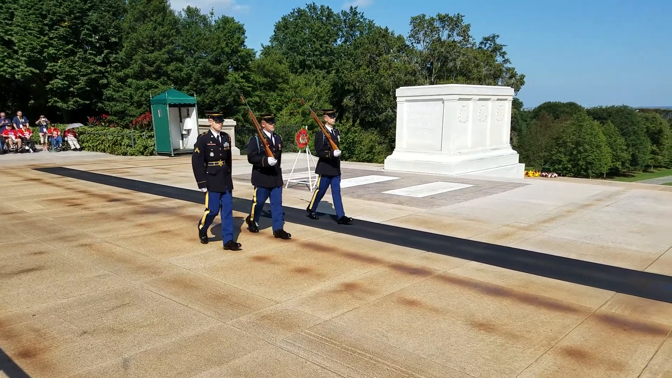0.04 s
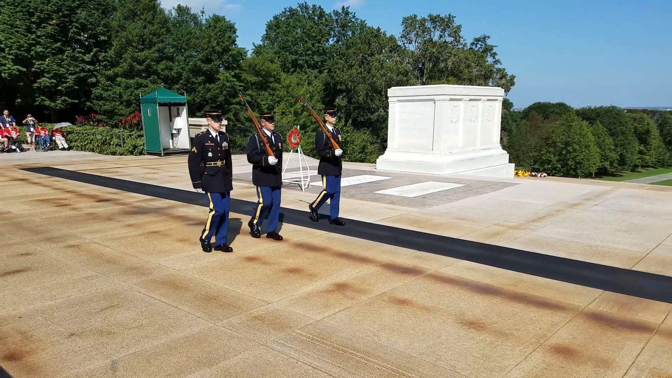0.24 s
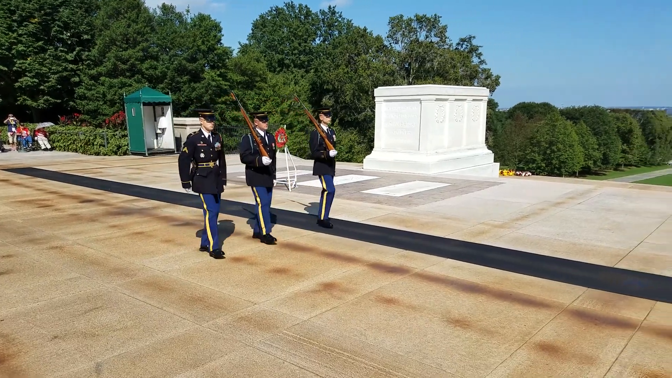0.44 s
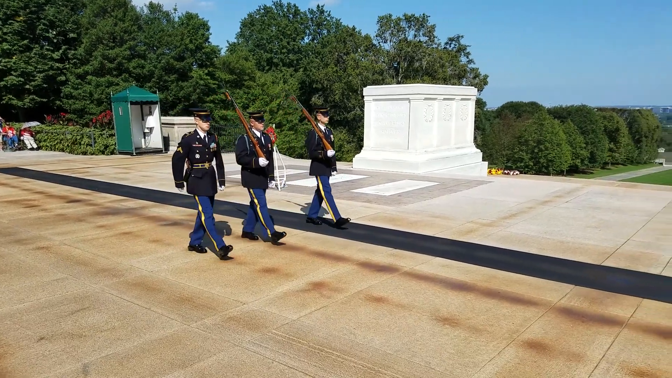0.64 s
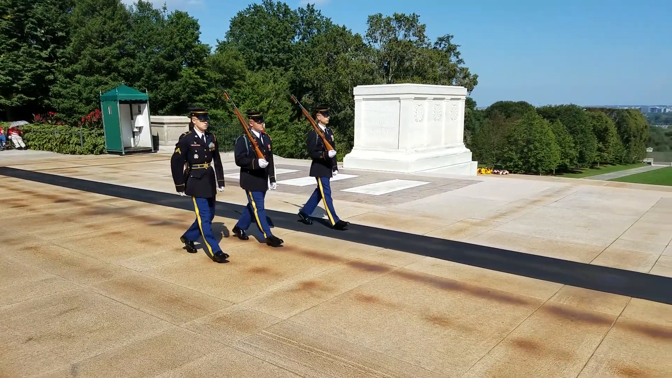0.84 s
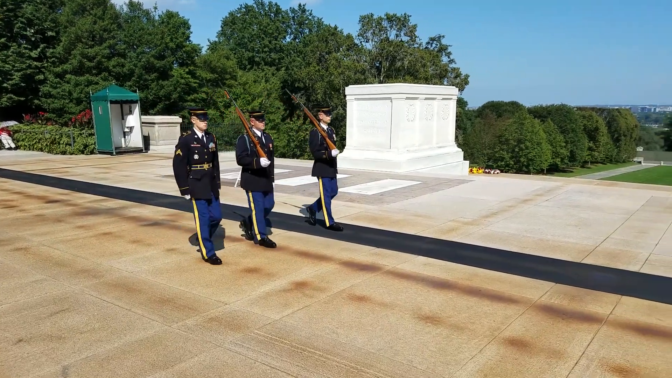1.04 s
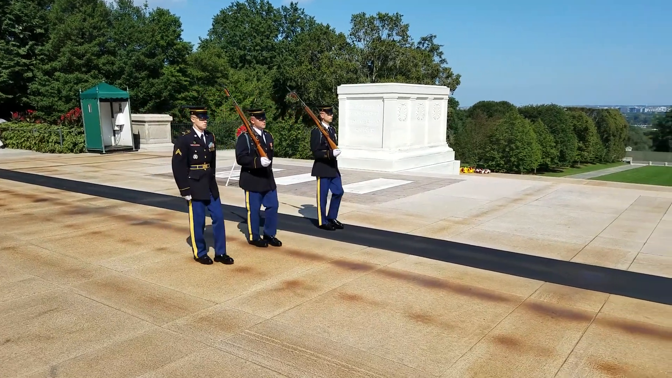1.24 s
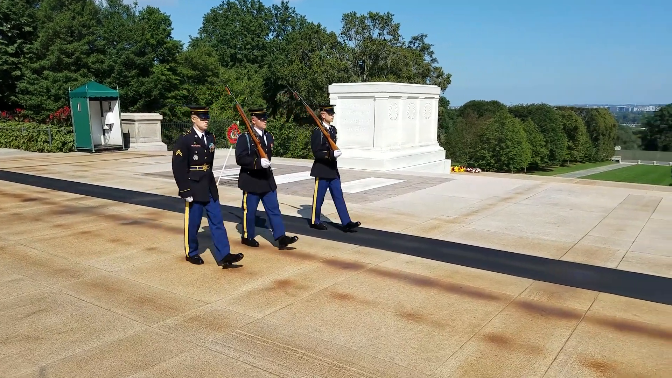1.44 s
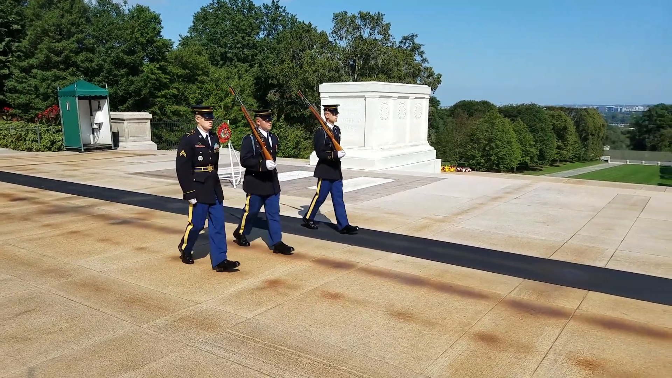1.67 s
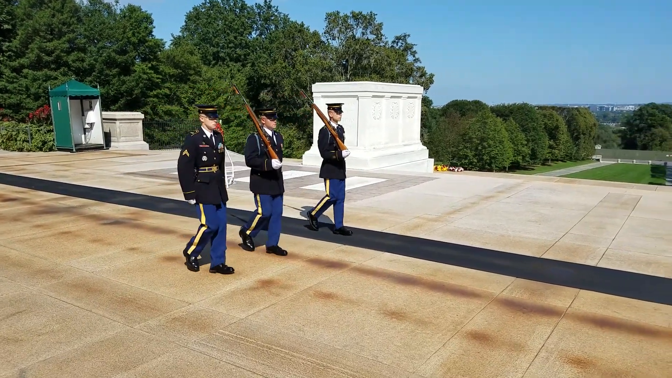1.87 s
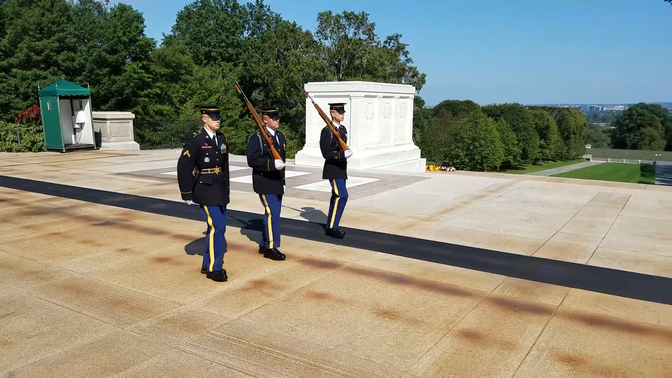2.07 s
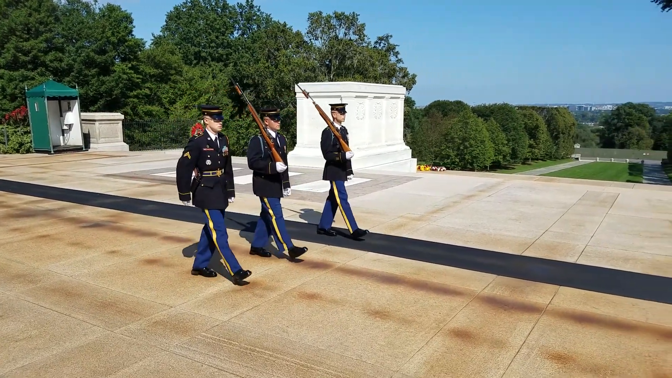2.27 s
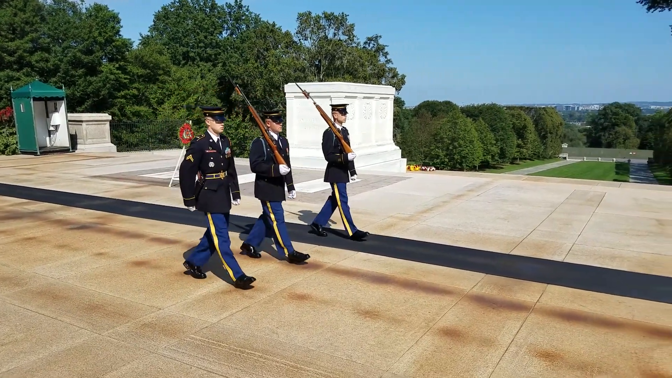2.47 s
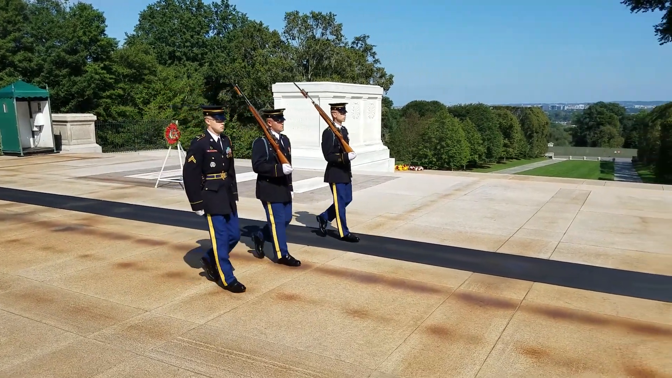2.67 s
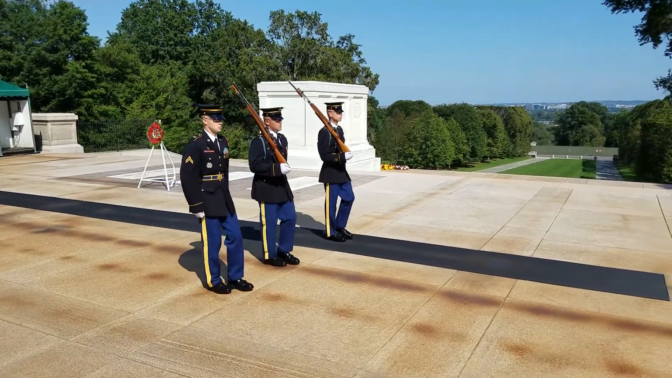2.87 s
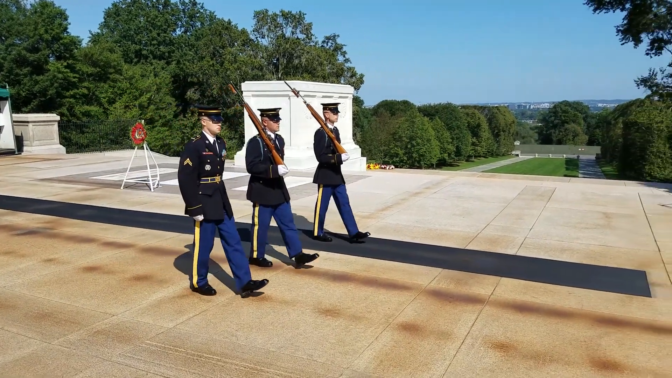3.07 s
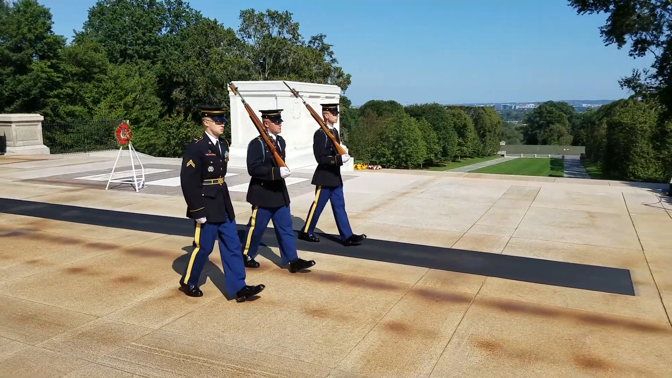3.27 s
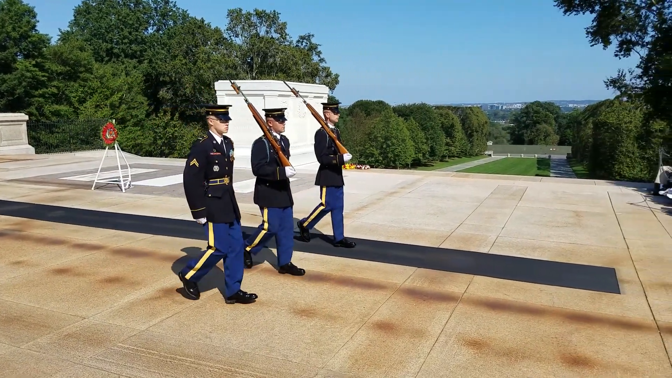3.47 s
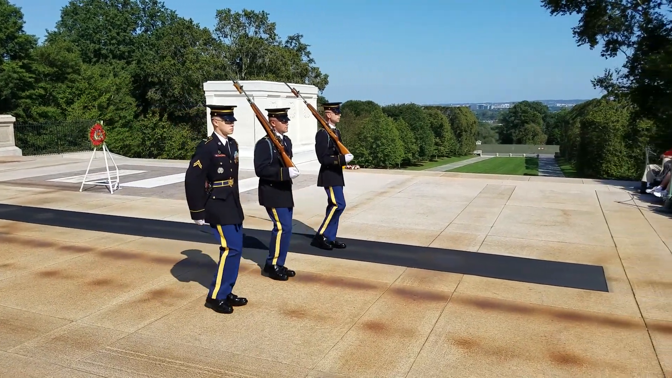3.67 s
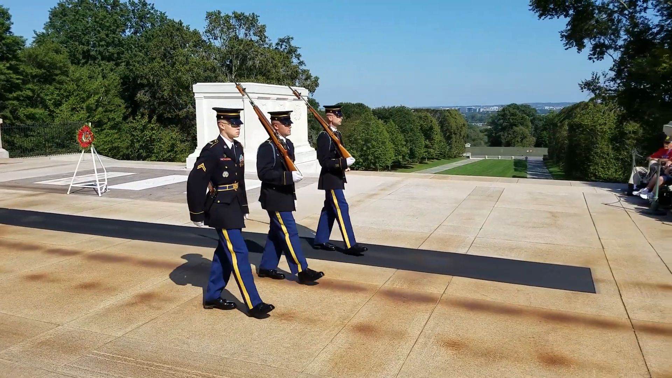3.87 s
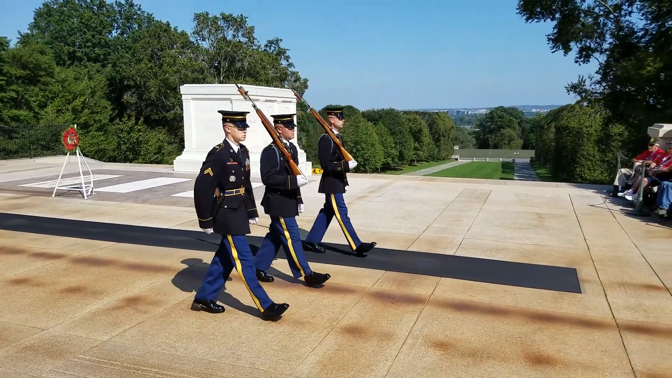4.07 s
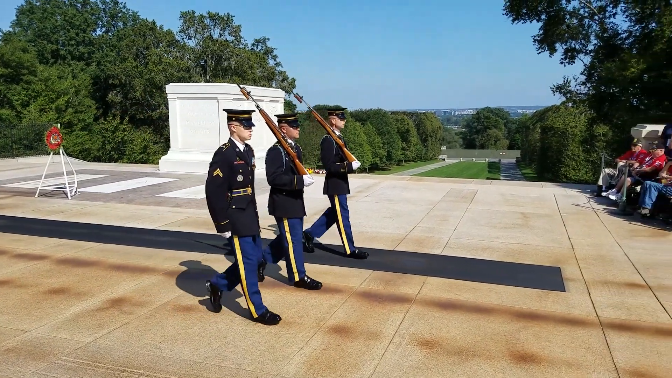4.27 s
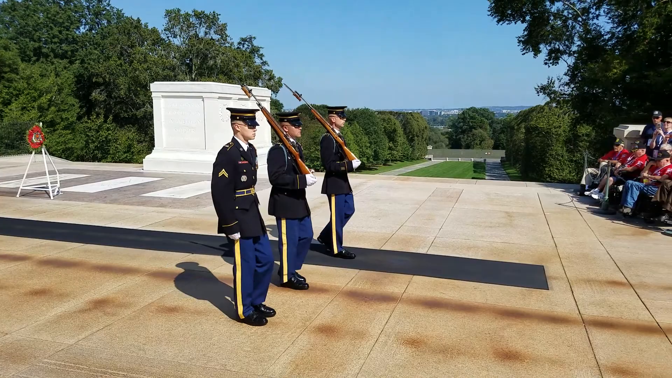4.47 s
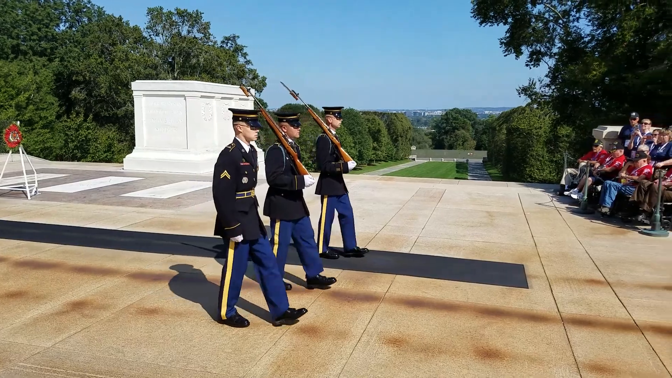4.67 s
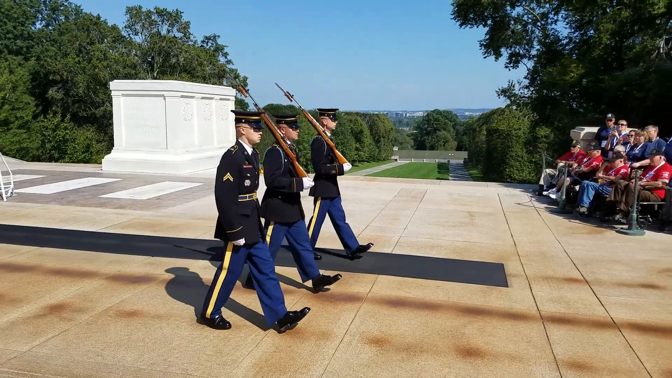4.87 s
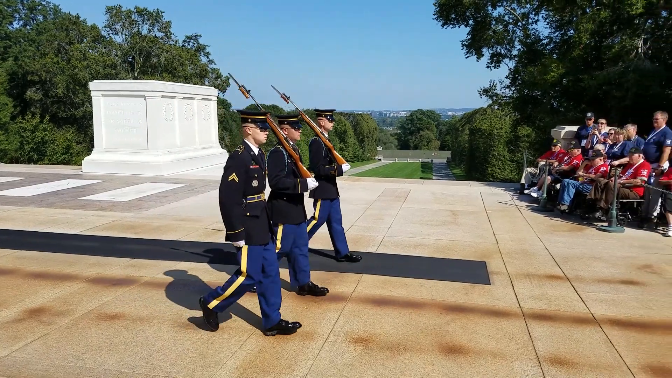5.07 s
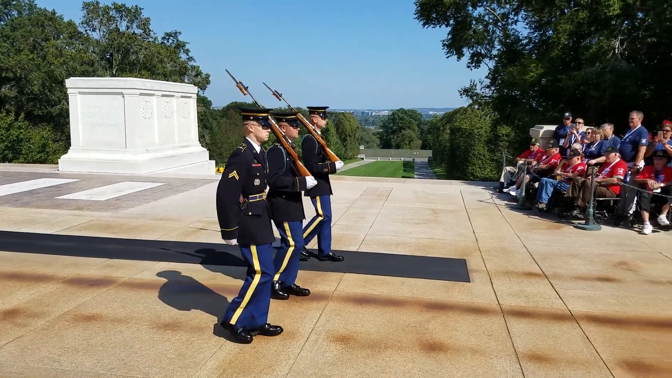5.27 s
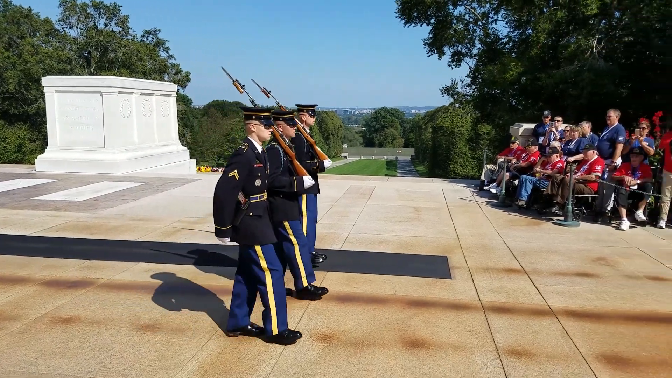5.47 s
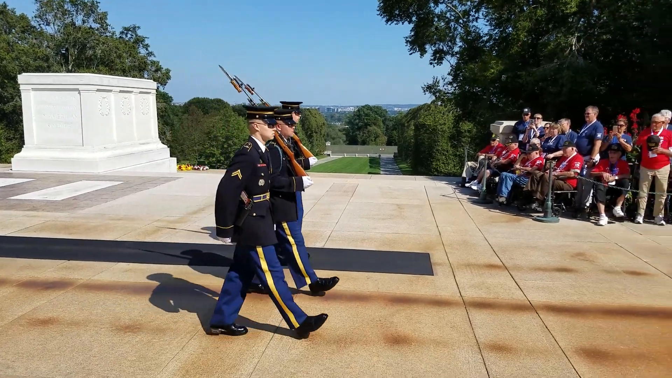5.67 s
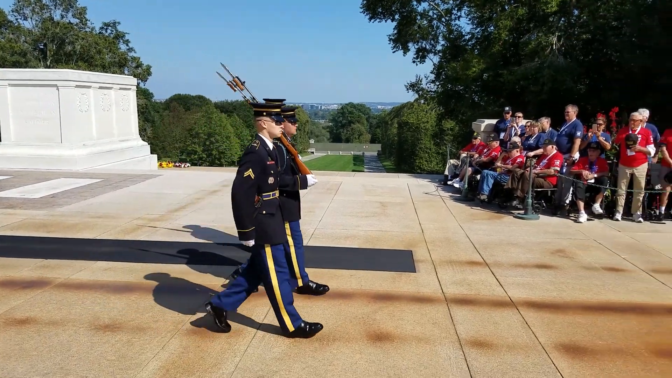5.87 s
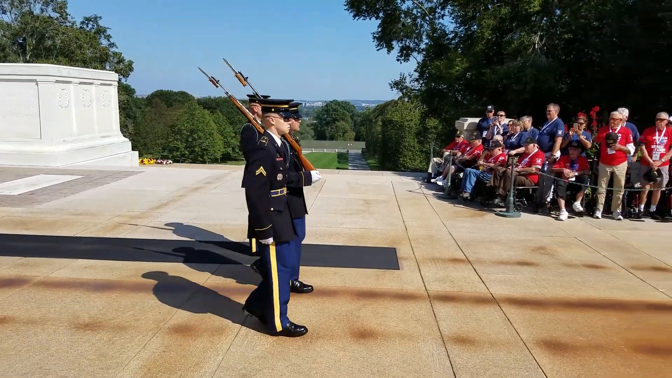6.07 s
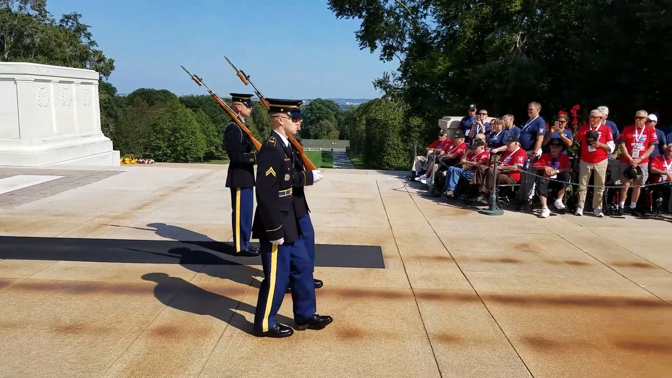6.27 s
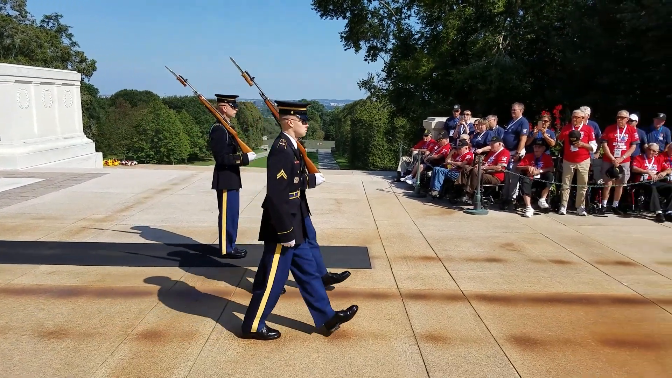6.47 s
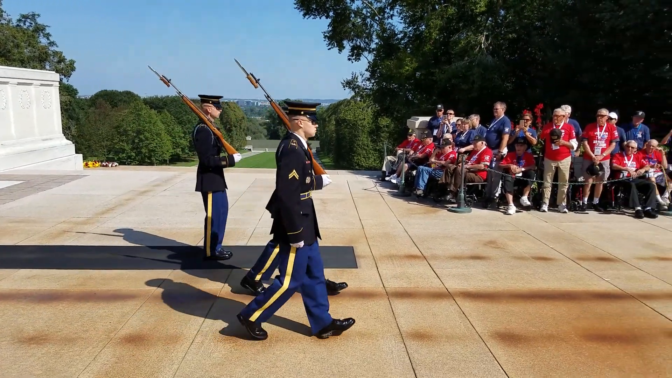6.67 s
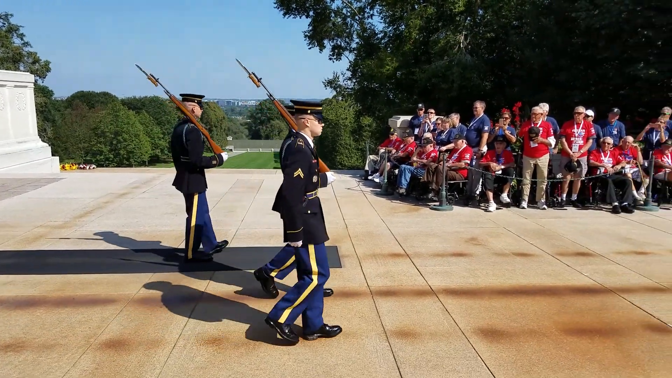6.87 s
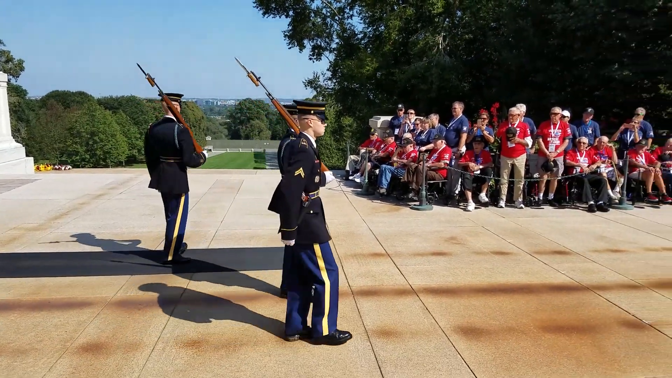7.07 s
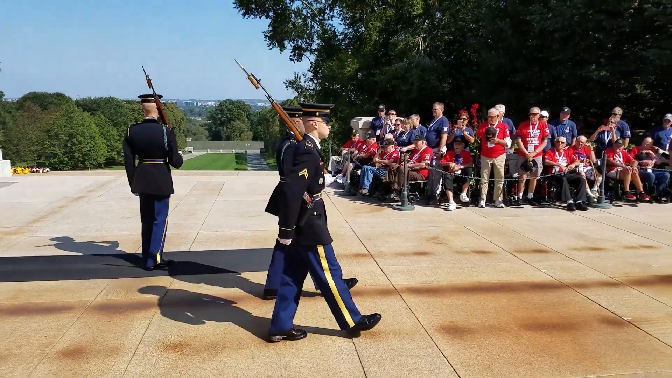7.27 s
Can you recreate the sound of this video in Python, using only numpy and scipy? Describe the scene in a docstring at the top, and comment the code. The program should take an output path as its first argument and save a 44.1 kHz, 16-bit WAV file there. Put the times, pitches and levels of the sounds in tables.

```python
"""An engine-like rumble with a hum, open air and an insect's chirps (shaped noise, wavering sines) sound throughout.
Light taps (noise bursts), two faint bird whistles (gliding sines) and the first step come before the rumble swells.
Guards march in slow step over stone, two steel-shod heels milliseconds apart (damped modes, noise bursts), with scuffs.
A low tone rises briefly in pitch. Later two shoes clack together and the stone terraces ring (decaying noise).
One more step and a few taps follow, and the rumble eases at the end."""
import sys
import numpy as np
from scipy import signal
from scipy.fft import rfft, irfft, next_fast_len
from scipy.io import wavfile
from scipy.ndimage import uniform_filter1d, map_coordinates

SR = 44100
rng = np.random.default_rng(int(sys.argv[2]) if len(sys.argv) > 2 else 0)


def pcm_store(signal):
    """Save signal as 16-bit PCM."""
    levels = np.round(np.clip(np.atleast_2d(signal), -1, 1) * 32767)
    wavfile.write(sys.argv[1], SR, levels.astype(np.int16).T)


N = 323694

# pan_db: left over right

# relative spectra of rumble, air and hiss: frequency_hz, density_db
RUMBLE_SPECTRUM = [(12, -69), (20, -27), (52, -1.5), (124, 0), (161, -3.5), (270, -6), (336, -17.5),
                   (396, -18.5), (436, -26.5), (520, -25.5), (680, -69), (1140, -120)]
AIR_SPECTRUM = [(200, -5), (330, 1.5), (400, -1.5), (490, -7.5), (620, -2.5), (840, 0), (1100, -11),
                (1600, -14.5), (2400, -26.5), (4000, -54)]
HISS_SPECTRUM = [(900, -19), (2000, 6), (3000, 2.5), (3500, -1), (5000, -1.5), (6900, -7), (7800, 0.5),
                 (8450, -1.5), (8900, -13.5), (11000, -8), (13000, -6.5), (15500, -5.5), (16300, -25)]
# left-right correlation of the background: frequency_hz, correlation
STEREO_LIKENESS = [(60, 0.88), (150, 1), (380, 0.88), (950, 0.25), (2380, -0.1), (5980, 0.0084),
                   (15000, -0.18)]
# engine hum, before its wander: centre_hz, level_re_rumble_db
HUM_TONES = [(60.5, -9), (124, -11.5)]
# clearer taps of soles and gear: start_s, clack_db, click_db, pan_db
TAPS = [(0.0454, -46.5, -56.5, -6), (0.876, -66, -47.5, -4), (0.9524, -54, -56.5, -5),
        (1.7048, -41.5, -53, -2.5), (2.9068, -56, -47, 9.5), (3.3735, -43, -57, -2),
        (3.3925, -46, -50.5, -3), (4.2502, -51, -51, -1), (4.2867, -56, -52, 7), (5.042, -48, -58, -5),
        (5.062, -45.5, -52, -1), (5.934, -44, -54, -2), (6.871, -45.5, -49.5, 1)]
# colour of a sole coming down flat: frequency_hz, gain_db
SOLE_COLOUR = [(450, -15), (850, 1.5), (1400, 4), (2000, 2.5), (2600, -8), (3400, -21), (8000, -30)]
# colour of a steel plate on stone: frequency_hz, gain_db
STEEL_COLOUR = [(1500, -32.5), (2900, 0), (4200, 2), (5800, -0.5), (7000, -6.5), (8500, -10), (11000, -6),
                (13000, -10), (15500, -7.5), (17000, -25)]
# colour of the plaza's returns: frequency_hz, gain_db
PLAZA_COLOUR = [(150, -13), (700, 1), (1500, 0.5), (2500, -4), (4000, -5), (8000, -3), (15000, -1)]
# decay of the plaza's returns: frequency_hz, t60_s
PLAZA_DECAY = [(200, 0.65), (1500, 0.9), (5000, 0.97), (15000, 0.45)]
# far bird's falling whistles, before their wander: start_s, length_s, start_hz, end_hz, level_db
WHISTLES = [(0.132, .46, 3370, 3060, -72.5), (0.893, 0.25, 3130, 3020, -74)]
# marching steps, base levels: start_s, second_heel_lag_s, thump_db, knock_db, click_db, second_over_first_db, scuff_db
STEPS = [(0.7603, 0.0062, -44.5, -41.5, -34, 0, -70), (1.605, 0.0079, -38, -35.5, -34.5, -5, -55.5),
         (2.43, .0054, -33, -42, -35, 2, -59.5), (3.2633, 0.0087, -30, -35, -36, -1, -63),
         (4.0825, .0034, -36, -39, -38.5, -2.5, -56.5), (4.9216, .0051, -31.5, -37, -37, 1, -64.5),
         (5.7416, .0193, -32.5, -42.5, -38.5, 1.5, -70), (6.6009, .0213, -29, -35.5, -38, 0.5, -58)]
# the two heels of a step, leader first: body_offset_db, pan_db
HEELS = [(-1, -4), (1, 1)]
# colour of a leather contact: frequency_hz, gain_db
LEATHER_COLOUR = [(500, -34), (1000, -0.5), (1400, -1.5), (1650, -8.5), (2100, 0), (2700, -1), (3400, -13),
                  (8000, -35)]
# colour of ground grit: frequency_hz, gain_db
SCUFF_COLOUR = [(800, -11), (1700, -2.5), (2400, 3.5), (3200, -7), (5000, -9), (7000, -10.5),
                (10500, -18.5), (12500, -7.5), (14000, -14)]
# shoes clacked together, sole edge then heel: start_s, body_db, click_db, pan_db
HEEL_CLACK = [(5.8095, -30, -27, -5), (5.8115, -17, -34, 10)]
# modes of the hollow heels: centre_hz, level_db, t60_s
HEEL_MODES = [(284, 7.5, 0.039), (602, -4.5, 0.065), (715, 2, 0.051), (864, -7, 0.029), (1360, -8.5, 0.016),
              (2020, -12.5, 0.015), (2280, -21, .022), (2750, -18, 0.027)]
# colour of the terraces' bright wash: frequency_hz, density_db
TERRACE_COLOUR = [(600, -19), (1000, -2), (1400, -4), (1750, -9), (2700, 0), (3200, -8.5), (4100, -4.5),
                  (4850, -8), (5400, -7.5), (6400, -2), (7100, -8), (9700, -8), (12300, -11), (16000, -18)]
# steel plates singing on in the wash: centre_hz, width_hz, level_db
PLATE_RESONANCES = [(2680, 110, -0.5), (4800, 160, 0), (6100, 130, 4), (6460, 140, 3), (7900, 140, 3),
                    (11000, 250, -5)]

RUMBLE_QUIET_DB, RUMBLE_STEADY_DB = -55, -42
SWELL_AT_S, SWELL_S = 1.21, 0.59
EASE_AT_S, EASE_DB_PER_S = 7.1, 24
CHIRP_CENTRE_S, CHIRP_PERIOD_S, CHIRP_LENGTH_S = .49, .51, .12
# gear ticks while the weight shifts after each step
TICK_FROM_S, TICK_SPAN_S = .04, .22
TICK_CLACK_MEAN_DB, TICK_CLICK_MEAN_DB = -56.5, -59
TICK_SCATTER_DB, TICK_PAN_SCATTER_DB = 2, 4
# shoe modes on the ground, before each blow's detuning
THUMP_CENTRE_HZ, THUMP_T60_S = 263, 0.039
KNOCK_CENTRE_HZ, KNOCK_T60_S = 805, 0.025
CLACK_RE_KNOCK_DB = -4.5
ROLL_S, SCUFF_S = .09, .21  # heel strike to scuff; scuff length
DRONE_AT_S, DRONE_ATTACK_S, DRONE_HOLD_S, DRONE_RELEASE_S = 2.95, .15, .38, .14
DRONE_START_HZ, DRONE_RISE_HZ_PER_S, DRONE_MEAN_DB = 205, 28, -44.5
WASH_HOLD_S, WASH_T60_S, WASH_BUILD_S = .085, .63, .012
TOP_HZ = 16350
BLOW_SAMPLES = round(.005 * SR)


def amp(db):
    """Decibels to gain."""
    return 10 ** (np.asarray(db) / 20)


def unit(x):
    """Scale to rms 1."""
    return x / np.sqrt(np.mean(x ** 2) + 1e-20)


def unit_blow(x):
    """Scale to rms 1 over the first 5 ms of a blow."""
    return x / np.sqrt(np.mean(x[..., :BLOW_SAMPLES] ** 2) + 1e-20)


def along(points, hz):
    """Interpolate (frequency, value) points on a log-frequency axis."""
    f, v = np.transpose(points)
    return np.interp(np.log(hz + 1), np.log(f + 1), v)


def wobble(knots_per_s):
    """Smooth random curve through evenly spaced knots."""
    knots = rng.standard_normal(int(N * knots_per_s / SR) + 4)
    return map_coordinates(knots, [np.arange(N) * knots_per_s / SR])


def ramp(start_s, length_s):
    """0 until the start, then straight up to 1."""
    return np.clip((np.arange(N) / SR - start_s) / length_s, 0, 1)


def sine(hz):
    """Sine that follows a frequency curve."""
    return np.sin(2 * np.pi * np.cumsum(hz) / SR)


def filtered(x, response):
    """Apply a frequency response."""
    n = x.shape[-1]
    m = next_fast_len(n + SR // 4)
    return irfft(rfft(x, m) * response(np.fft.rfftfreq(m, 1 / SR)), m)[..., :n]


def coloured(x, points, size=2048):
    """Minimum-phase filter of the given shape: nothing sounds before the blow."""
    cepstrum = irfft(np.log(amp(along(points, np.fft.rfftfreq(size, 1 / SR)))))
    cepstrum[1:size // 2] *= 2
    cepstrum[size // 2 + 1:] = 0
    impulse = irfft(np.exp(rfft(cepstrum)))
    return signal.fftconvolve(x, impulse[None], axes=1)[:, :x.shape[1]]


def add(track, start_s, sound):
    """Mix a stereo sound into the track."""
    part = track[:, round(start_s * SR):][:, :sound.shape[1]]
    part += sound[:, :part.shape[1]]


def sides(pan_db):
    """Left and right gains."""
    return amp([[pan_db / 2], [-pan_db / 2]])


def grit(size, lumpy_db):
    """Uneven strength, millisecond by millisecond, of many tiny contacts or returns."""
    lumps = uniform_filter1d(rng.standard_normal(size), size=48)
    return unit(amp(lumpy_db * unit(lumps)))


def crack(colour, t60_s, grit_db, grit_t60_s, width):
    """Hard contact: a very short noise burst, then grit crushed underneath."""
    t = np.arange(SR // 8) / SR
    burst = amp(-60 * t / t60_s)
    crush = amp(grit_db - 60 * t / grit_t60_s) * grit(size=len(t), lumpy_db=2.0)
    noise = rng.standard_normal(len(t)) + width * rng.standard_normal((2, len(t)))
    return unit_blow(coloured(noise * (burst + crush), colour))


def mode(centre_hz, t60_s, scatter):
    """Damped resonance, tuned a little differently by each blow."""
    t = np.arange(SR // 8) / SR
    hz = centre_hz * np.exp(scatter * rng.standard_normal())
    return unit_blow(np.sin(2 * np.pi * hz * t) * amp(-60 * t / t60_s))


def plaza(sound, build_s):
    """Scattered returns from steps, walls and trees, drawn anew for each contact."""
    hz, t, z = signal.stft(rng.standard_normal((2, SR)), SR, nperseg=256)
    decay = amp(-60 * t / along(PLAZA_DECAY, hz)[:, None])
    tail = signal.istft(z * decay * (1 - np.exp(-t / build_s)), SR, nperseg=256)[1]
    response = coloured(tail / np.linalg.norm(tail[0]), PLAZA_COLOUR)
    return signal.fftconvolve(sound, response, axes=1)


def rush(spectrum, patchy_db):
    """Stereo noise of rms 1 with time-frequency patches of random gain."""
    z = signal.stft(rng.standard_normal((2, N)), nperseg=512)[2]
    field = uniform_filter1d(rng.standard_normal(z.shape[1:]), size=6, axis=0)
    field = uniform_filter1d(field, size=14, axis=1)
    pair = signal.istft(z * amp(patchy_db * unit(field)), nperseg=512)[1][:, :N]

    def mid_side_response(hz):
        """Split power between mid and side to set the left-right correlation."""
        angle = np.arccos(np.clip(along(STEREO_LIKENESS, hz), -1, 1)) / 2
        return amp(along(spectrum, hz)) * np.array([np.cos(angle), np.sin(angle)])

    mid, side = filtered(pair, mid_side_response)
    return unit(np.array([mid + side, mid - side]))


def background():
    """Distant engine rumble (low noise) with wavering hum, under the rush of open air."""
    swell = np.sin(np.pi / 2 * ramp(SWELL_AT_S, SWELL_S))
    ease_db = EASE_DB_PER_S * np.maximum(np.arange(N) / SR - EASE_AT_S, 0)
    rumble_db = RUMBLE_QUIET_DB + (RUMBLE_STEADY_DB - RUMBLE_QUIET_DB) * swell - ease_db
    hum = np.zeros(N)
    for centre_hz, level_db in HUM_TONES:
        level = amp(level_db + 1.4 * wobble(4.4)) * np.sqrt(2)
        hum += level * sine(centre_hz * (1 + 0.02585 * wobble(7)))
    rumble = amp(rumble_db) * (rush(RUMBLE_SPECTRUM, patchy_db=1.5) + hum)
    air = amp(-53.5 + 1.64 * wobble(1.91)) * rush(AIR_SPECTRUM, patchy_db=1.14)
    hiss = amp(-63.0 + 0.1 * wobble(2.7)) * rush(HISS_SPECTRUM, patchy_db=1.8)
    return rumble * sides(.3) + air * sides(-1.3) + hiss * sides(0.63)


def insect():
    """Bush cricket in the trees: short, very high, wavering tone pulses at a steady pace."""
    half_period_s = CHIRP_PERIOD_S / 2
    from_centre_s = (np.arange(N) / SR - CHIRP_CENTRE_S + half_period_s) % CHIRP_PERIOD_S - half_period_s
    chirps = np.exp(-(2 * from_centre_s / CHIRP_LENGTH_S) ** 4)
    hz = 13000 + 60 * wobble(5) + 90 * wobble(400)
    return amp(-79.0 + 2.5 * wobble(14)) * chirps * sine(hz)


def ticks(count):
    """Faint contacts at random moments after each step, as rows like those of TAPS."""
    starts_s = np.repeat([step[0] for step in STEPS], count)
    times_s = starts_s + TICK_FROM_S + TICK_SPAN_S * rng.random(len(starts_s))
    scatter_db = [TICK_SCATTER_DB, TICK_SCATTER_DB, TICK_PAN_SCATTER_DB]
    spread_db = rng.standard_normal((len(starts_s), 3)) * scatter_db
    return np.column_stack([times_s, spread_db + [TICK_CLACK_MEAN_DB, TICK_CLICK_MEAN_DB, 0]])


def taps():
    """Soles settle and gear ticks: light noise-burst contacts with plaza returns."""
    out = np.zeros((2, N))
    for start_s, clack_db, click_db, pan_db in [*TAPS, *ticks(count=2)]:
        clack = amp(clack_db) * crack(SOLE_COLOUR, t60_s=.007, grit_db=-14, grit_t60_s=.08, width=.7)
        click = amp(click_db) * crack(STEEL_COLOUR, t60_s=.006, grit_db=-14, grit_t60_s=.05, width=.6)
        tap = (clack + click) * sides(pan_db)
        add(out, start_s, tap)
        add(out, start_s, amp(-9) * plaza(tap, build_s=0.007))
    return out


def bird():
    """Thin sine whistles that drop quickly, then level off."""
    out = np.zeros((2, N))
    for start_s, length_s, start_hz, end_hz, level_db in WHISTLES:
        u = np.linspace(0, 1, round(length_s * SR))
        hz = end_hz + (start_hz - end_hz) * (1 - u) ** 2 + 14 * wobble(90)[:len(u)]
        level = amp(level_db + 3.1 * wobble(44)[:len(u)]) * np.sin(np.pi * u)
        add(out, start_s, level * sine(hz) * sides(1))
    return out


def footsteps():
    """Two heels land just apart; each thumps and knocks the shoe while its steel plate clicks on stone."""
    out = np.zeros((2, N))
    for start_s, lag_s, thump_db, knock_db, click_db, accent_db, _ in STEPS:
        for late, (body_db, pan_db) in enumerate(HEELS):
            knock = amp(knock_db) * mode(KNOCK_CENTRE_HZ, KNOCK_T60_S, scatter=0.088)
            thump = amp(thump_db) * mode(THUMP_CENTRE_HZ, THUMP_T60_S, scatter=0.15)
            body = amp(body_db) * (knock - thump)
            clack = crack(LEATHER_COLOUR, t60_s=0.0023, grit_db=-20, grit_t60_s=0.1, width=0.92)
            click = crack(STEEL_COLOUR, t60_s=0.0048, grit_db=-17.5, grit_t60_s=0.069, width=0.46)
            contact = amp(knock_db + CLACK_RE_KNOCK_DB) * clack + amp(click_db - 1.0) * click
            step = amp((late - .5) * accent_db) * (body + contact * sides(pan_db))
            add(out, start_s + late * lag_s, step)
            add(out, start_s + late * lag_s, amp(-10) * plaza(step, build_s=0.014))
    return out


def scuffs():
    """After each heel strike the other sole rolls off the stone and grinds a little grit."""
    out = np.zeros((2, N))
    size = round(SCUFF_S * SR)
    for start_s, *_, scuff_db in STEPS:
        grains = rng.standard_normal((2, size)) * grit(size=size, lumpy_db=6)
        envelope = np.sqrt(np.hanning(size))
        add(out, start_s + ROLL_S, amp(scuff_db) * envelope * unit(coloured(grains, SCUFF_COLOUR)))
    return out


def drone():
    """Faint low sine that swells, holds and fades while its pitch rises steadily."""
    release_at_s = DRONE_AT_S + DRONE_ATTACK_S + DRONE_HOLD_S
    envelope = ramp(DRONE_AT_S, DRONE_ATTACK_S) * (1 - ramp(release_at_s, DRONE_RELEASE_S))
    hz = DRONE_START_HZ + DRONE_RISE_HZ_PER_S * (np.arange(N) / SR - DRONE_AT_S)
    return envelope * amp(DRONE_MEAN_DB + 1.6 * wobble(17)) * np.sqrt(2) * sine(hz)


def terrace_wash():
    """Rows of terraces answer at about the same strength, then die away; steel plates sing within."""
    t = np.arange(SR) / SR
    decay = amp(-60 * np.maximum(t - WASH_HOLD_S, 0) / WASH_T60_S)
    envelope = (1 - np.exp(-t / WASH_BUILD_S)) * decay
    noise = rng.standard_normal((2, SR)) + 0.27 * rng.standard_normal(SR)
    returns = unit(coloured(noise * grit(size=SR, lumpy_db=2.0), TERRACE_COLOUR))

    def plates(f):
        """Sum of resonance peaks."""
        return sum(amp(db) / (1 + (2 * (f - hz) / width_hz) ** 2) for hz, width_hz, db in PLATE_RESONANCES)

    ring = unit(filtered(rng.standard_normal((2, SR)), plates))
    return envelope * (amp(-44.0) * returns + amp(-47.5) * ring) * sides(-0.89)


def heel_clack():
    """Shoe against shoe: a hollow double blow of damped modes and bursts, with the terraces' wash."""
    out = np.zeros((2, N))
    for start_s, body_db, click_db, pan_db in HEEL_CLACK:
        body = 0
        for k, (hz, level_db, t60_s) in enumerate(HEEL_MODES):
            body = body + (-1) ** k * amp(level_db) * mode(hz, t60_s, scatter=0.011)
        clack = amp(-5) * crack(LEATHER_COLOUR, t60_s=0.0046, grit_db=-10.5, grit_t60_s=0.12, width=.7)
        click = crack(STEEL_COLOUR, t60_s=0.004, grit_db=-15.5, grit_t60_s=0.079, width=1.0)
        contact = amp(click_db) * (clack + click) * sides(pan_db)
        add(out, start_s, amp(body_db) * unit_blow(body) + contact)
    add(out, HEEL_CLACK[0][0], terrace_wash())
    return out


def scene():
    """The guards on the plaza, over the background."""
    return background() + insect() + taps() + bird() + footsteps() + scuffs() + drone() + heel_clack()


def record(dry):
    """Steep low-pass, 3 dB down at TOP_HZ."""
    return filtered(dry, lambda hz: 1 / np.sqrt(1 + (hz / TOP_HZ) ** 120))


dry = scene()
out = record(dry)
pcm_store(out)
```